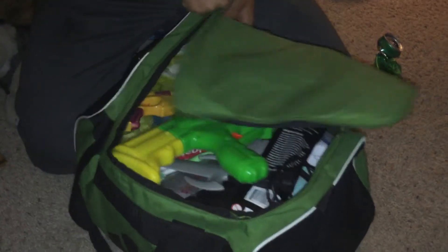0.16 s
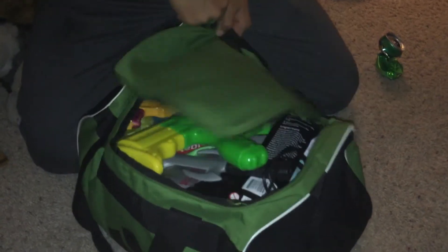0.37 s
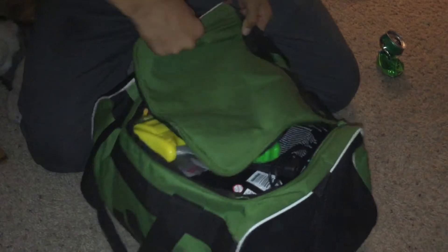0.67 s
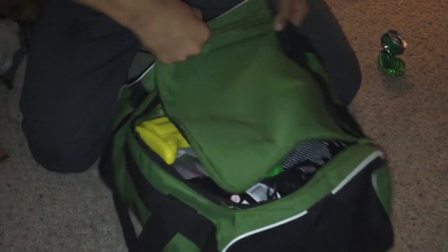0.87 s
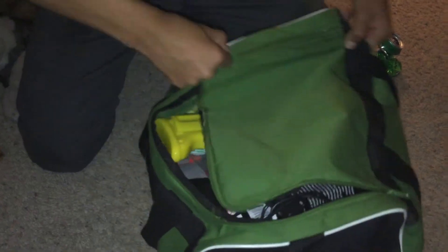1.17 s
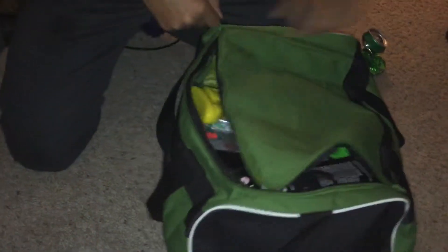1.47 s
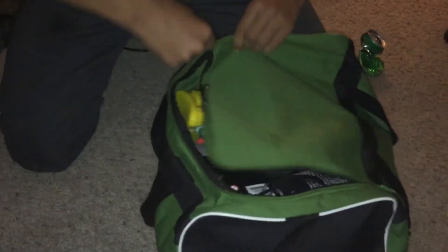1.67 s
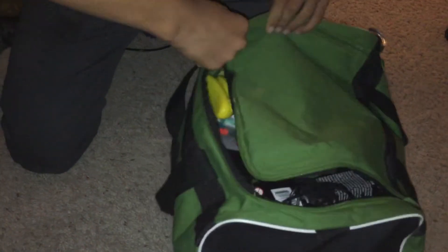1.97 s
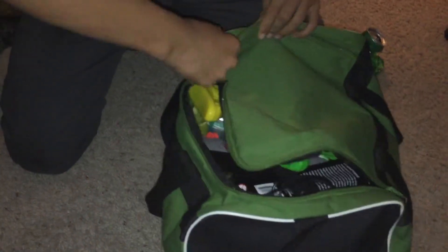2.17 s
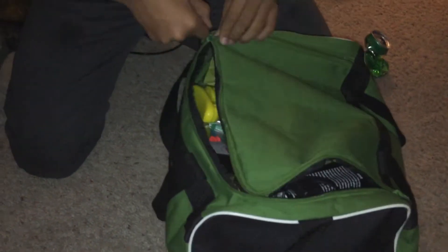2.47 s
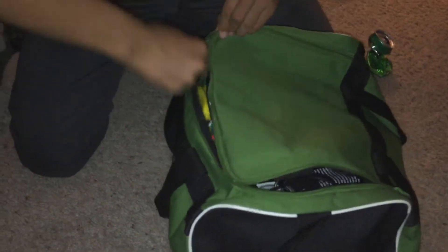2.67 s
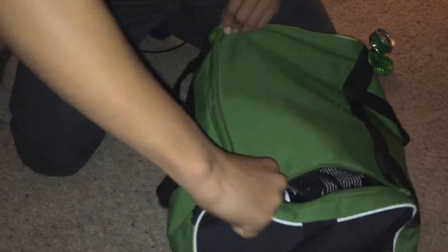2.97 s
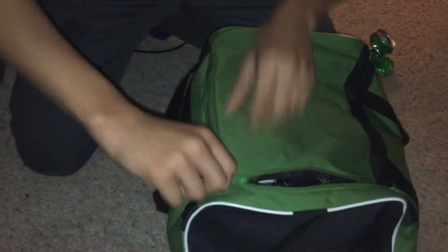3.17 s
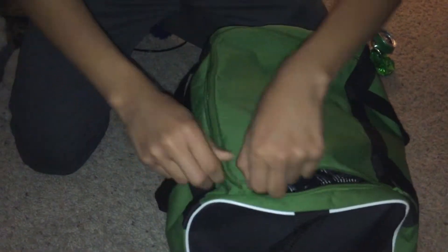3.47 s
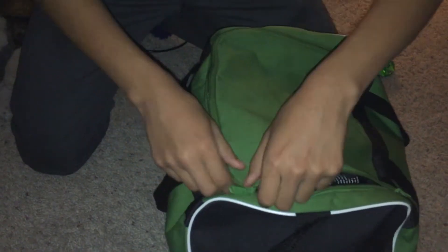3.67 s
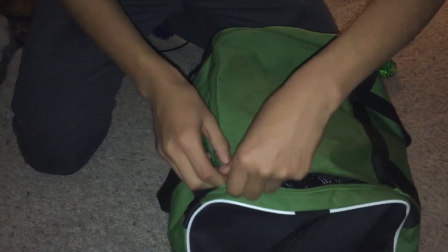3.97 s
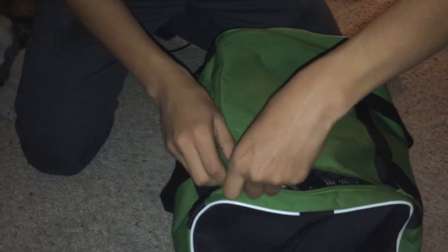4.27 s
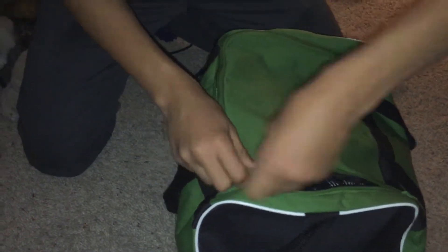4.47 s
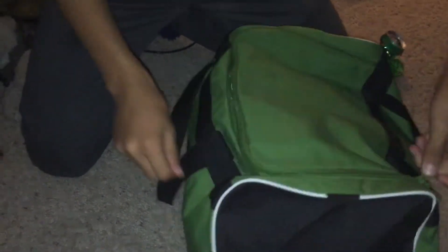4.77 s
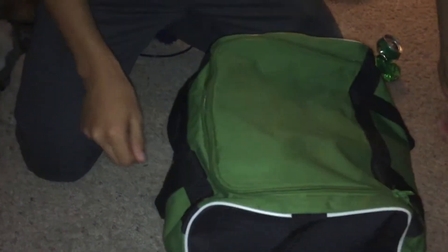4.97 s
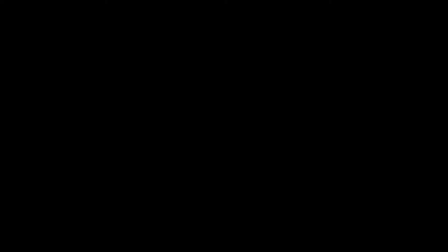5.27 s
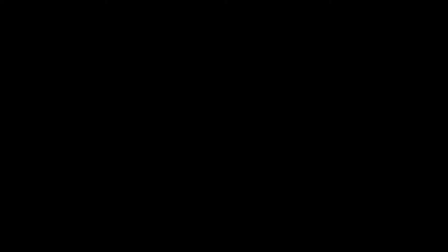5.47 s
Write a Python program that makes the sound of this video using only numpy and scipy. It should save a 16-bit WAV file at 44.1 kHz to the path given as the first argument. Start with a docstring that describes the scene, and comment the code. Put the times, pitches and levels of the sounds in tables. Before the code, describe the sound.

Close view of a fabric bag in a small, quiet carpeted room. Cloth rustles and flops, a short zipper buzz, more crumpling, then a sharp louder jerk of the zip. After a calmer stretch of faint brushing comes a longer, higher, softer pull. The metal tab clinks, then a very quick bright zip ends with a hard click and fading rustle.

```python
"""A buzz rises with each tug as a fabric duffel bag is zipped shut in four short pulls on the carpet of a
quiet room. Between pulls the cloth rustles and flops, things inside knock and the metal pull tab clinks.
The buzz is a train of tooth snaps, two tapes meshing in turn, through the resonances of tape and bag.
Cloth is filtered noise, drum notes and crackle; metal and knocks are struck decaying sines; a faint hush
lies below."""
import sys
import numpy as np
from scipy import signal
from scipy.fft import rfft, irfft, next_fast_len
from scipy.io import wavfile
from scipy.ndimage import uniform_filter1d

SR = 44100
rng = np.random.default_rng(int(sys.argv[2]) if len(sys.argv) > 2 else 0)


def unload_wav(signal):
    """Save mono or channel-first audio to the path in sys.argv[1] as 16-bit WAV at rate SR, clipped to [-1, 1]."""
    wavfile.write(
        sys.argv[1],
        SR,
        np.round(np.clip(np.atleast_2d(signal).T, -1, 1) * 32767).astype(np.int16),
    )


N = 247842
END_S = 5.118
TIME = np.arange(N) / SR
BLOW = TIME[:SR // 4]  # time axis of one short hit

# scratchy spectrum of the slider's scrape and of hands on the weave: f/Hz, level/dB
SCRAPE_SPECTRUM = [(800, -7.5), (2600, 1), (4500, -3.5), (7000, -2.5), (8700, 1.5), (10500, -3.5),
                   (13000, -5)]
# spectrum of stiff cloth crumpling: f/Hz, level/dB
CRUMPLE_SPECTRUM = [(150, -14.5), (450, -4.5), (1100, 1), (2000, -5), (4500, -14), (8000, -16.5),
                    (16000, -24.5)]
# the hands shift the bag: start t/s, length/s, heaving level/dB, crumpling level/dB
BAG_SHIFTS = [(0, 0.23, -48.5, -48.5), (0.36, 0.13, -49.5, -56), (0.506, 0.24, -46.5, -46),
              (0.871, 0.044, -37, -41), (0.96, 0.065, -45, -52), (1.012, 0.057, -38.5, -43.5),
              (1.274, 0.13, -39, -40.5), (1.465, 0.26, -50.5, -57.5), (1.71, 0.063, -47, -52),
              (1.905, 0.21, -59, -63), (2.318, 0.04, -48.5, -56.5), (2.658, 0.29, -46.5, -53),
              (2.915, 0.051, -38, -46), (2.994, 0.078, -46.5, -56), (3.498, 0.2, -64.5, -70),
              (4.578, 0.13, -40, -41.5), (4.669, 0.042, -35, -32), (4.782, 0.12, -46, -58),
              (4.884, 0.047, -42.5, -47)]


def undb(db):
    """Decibels to gain."""
    return 10 ** (np.asarray(db) / 20)


def unit(x):
    """Scale to rms 1."""
    return x / np.sqrt(np.mean(x ** 2))


def peak(x, db):
    """Scale to a peak level."""
    return x * undb(db) / np.max(np.abs(x))


def smooth(x, seconds):
    """Triangular running mean: two box averages of this length."""
    k = int(seconds * SR) + 1
    return uniform_filter1d(uniform_filter1d(x, k), k)


def even(x, seconds):
    """Level the running rms to about 1."""
    return x / np.sqrt(np.abs(smooth(x ** 2, seconds)) + 1e-12)


def colour(x, points):
    """Causal minimum-phase filter through (Hz, dB) points."""
    hz, db = np.transpose(points)
    half = next_fast_len(len(x) // 2 + 4096)
    freq = np.linspace(1, SR / 2, half + 1)
    level_db = np.interp(np.log(freq), np.log(hz), db)
    # folding the cepstrum onto positive time makes the filter causal
    cepstrum = irfft(np.log(undb(level_db)))
    cepstrum[1:half] *= 2
    cepstrum[half:] = 0
    return irfft(rfft(x, 2 * half) * np.exp(rfft(cepstrum)))[:len(x)]


def resonate(x, hz, width):
    """Two-pole band-pass, gain 1 at the centre."""
    b, a = signal.iirpeak(hz, hz / min(width, SR / 4), fs=SR)
    return signal.lfilter(b, a, x)


def fade(t60):
    """Exponential decay, 60 dB down after t60 seconds."""
    return np.exp(-np.log(1000) * BLOW / t60)


def burst(t60):
    """Noise that dies away."""
    return rng.standard_normal(len(BLOW)) * fade(t60)


def ring(modes):
    """Struck modes (Hz, dB, t60 s), their balance a little different at each blow."""
    out = np.zeros(len(BLOW))
    for hz, db, t60 in modes:
        out += undb(db + rng.normal()) * fade(t60) * np.sin(2 * np.pi * hz * BLOW)
    return out


def add(out, start, sound):
    """Mix a sound in at its time."""
    i = int(start * SR)
    out[i:i + len(sound)] += sound[:N - i]


def flicker(rate, depth_db):
    """A gain that wanders at random between rate knots per second."""
    knots = np.arange(0, N / SR + 1, 1 / rate)
    return undb(depth_db * np.interp(TIME, knots, rng.standard_normal(len(knots))))


def grains(rate, spread_db, rub):
    """Tiny slips of uneven size, rate per second, over smooth rubbing."""
    happens = rng.random(N) < rate / SR
    size = undb(spread_db * (2 * rng.random(N) - 1))
    slips = happens * rng.standard_normal(N) * size
    return unit(slips) + rub * rng.standard_normal(N)


def zipper():
    """Four pulls of one to three tugs; in the last, tight and askew tapes snap brightly in close pairs."""
    # tugs on the slider: top speed t/s, build-up/s, slow-down/s, top tooth rate of one tape f/Hz,
    # buzz level/dB, level slope/(dB per octave of speed), bite at top speed/dB
    tugs = [(.667, 0.068, 0.056, 666, -32, 3, 8), (1.309, 0.027, 0.027, 659, -22.5, 10.5, -0.5),
            (1.318, 0.032, 0.016, 574, -25.5, 6, 2.5), (2.785, .08, .056, 842, -34, 5, 0),
            (2.892, 0.11, 0.031, 1123, -34, -1, 5), (4.632, .047, .05, 1028, -29, 6.5, 0),
            (4.665, .03, .014, 1673, -28.5, 7.5, 3), (4.683, 0.031, 0.0091, 1596, -27, 6.5, 9.5)]
    first = pull(tugs[:1], twin=.55, jitter=.05, scatter_db=3, rasp=.35, scrape_db=-20, lag=.5,
                 soft_hz=190, tape_pitch=1.04, bright_db=-0.2)
    jerk = pull(tugs[1:3], twin=.65, jitter=.06, scatter_db=2.8, rasp=.3, scrape_db=-19, lag=.5,
                soft_hz=207, tape_pitch=0.84, bright_db=-0.6)
    side = pull(tugs[3:5], twin=.42, jitter=.05, scatter_db=3, rasp=.22, scrape_db=-10, lag=.5,
                soft_hz=400, tape_pitch=1.01, bright_db=1.0)
    last = pull(tugs[5:], twin=.55, jitter=.018, scatter_db=1.5, rasp=.06, scrape_db=-7, lag=.34,
                soft_hz=600, tape_pitch=0.96, bright_db=3.0)
    return first + jerk + side + last


def pull(tugs, twin, jitter, scatter_db, rasp, scrape_db, lag, soft_hz, tape_pitch, bright_db):
    """Teeth snap and rub; the second tape (strength twin) lags by a share of a cycle, bites with speed."""
    # body of the buzz: f/Hz, level/dB
    tape_spectrum = [(80, -16), (240, 7.5), (500, 2), (1300, 3), (3000, -14), (5000, -22), (16000, -25)]
    # resonances of the taut tape and the bag behind it: f/Hz (times tape_pitch), width/Hz, level/dB
    tape_modes = [(610, 63, 4.5), (990, 320, 3.5), (1400, 68, -7.5), (2058, 170, -5.5)]
    # dull putter of slow teeth: f/Hz, level/dB
    putter_spectrum = [(90, -14.5), (250, -0.5), (600, -1.5), (9000, -42)]
    tooth_slop = .03  # scatter of the tooth spacing, in cycles of one tape
    seize_s = 0.012  # the sound eases in as the slider starts to move

    rate_hz, buzz_db = stroke(tugs)
    moving = rate_hz > 0
    tension, friction, unevenness, slop = rng.standard_normal((4, N))
    # uneven tension makes the slider hurry and lag
    speed = rate_hz[moving] * np.exp(jitter * unit(smooth(tension[moving], .001)))
    travel = np.cumsum(2 * speed / SR)  # in teeth, both tapes counted

    tooth = np.arange(int(travel[-1]))
    second = tooth % 2
    second_size = twin * np.minimum(np.interp(tooth, travel, speed) / 550, 1)
    size = np.where(second, second_size, 1) * undb(scatter_db * unevenness[tooth])
    cycle = tooth // 2 + lag * second + tooth_slop * slop[tooth]
    place = np.interp(2 * cycle, travel, np.arange(len(speed)))
    # share each snap between its two nearest samples
    sample, fraction = place.astype(int), place % 1
    snaps = np.zeros(len(speed) + 1)
    np.add.at(snaps, sample, size * (1 - fraction))
    np.add.at(snaps, sample + 1, size * fraction)
    snaps = unit(snaps - smooth(snaps, 0.0069))[:-1]

    # rubbing surges once per tooth of travel, then eases
    rubbing = unit(np.exp(-(travel % 1) / 0.44) * friction[moving])
    force = disperse(snaps) + rasp * rubbing
    # each stretch of tape has its own pitch
    buzz = colour(force, tape_spectrum)
    for hz, width, db in tape_modes:
        buzz = buzz + undb(db) * resonate(force, tape_pitch * hz, width)
    # tension tilts it by bright_db an octave over four octaves
    buzz = colour(buzz, [(500, 0), (8000, 4 * bright_db)])
    # below soft_hz the teeth slip in with a dull putter instead of a snap
    hard = 1 / (1 + (soft_hz / speed) ** 4)
    putter = unit(colour(force, putter_spectrum))
    buzz = hard * unit(buzz) + (1 - hard) * putter

    seize = 1 - np.exp(-TIME[:len(speed)] / seize_s)
    scrape = colour(rubbing + 0.38 * snaps, SCRAPE_SPECTRUM)
    mix = even(buzz, 0.019) + undb(scrape_db) * even(scrape, 0.0066)
    out = np.zeros(N)
    out[moving] = seize * mix * undb(buzz_db[moving])
    return out


def stroke(tugs):
    """Tooth rate and buzz level: a tug builds up, bites at top speed, stops short; the faster tug leads."""
    roundness, stall_share = 1.3, .16  # of the speed peak; share of top speed below which the slider sticks
    bite_share, relax_db = 0.48, 8.5  # bite width as a share of slow-down; grip loss one slow-down later
    at, build, slow, top_hz, db, db_per_octave, bite_db = np.transpose(tugs)[:, :, None]
    after = (TIME - at) / slow
    share = np.exp(-np.maximum((at - TIME) / build, after) ** roundness)
    rate_hz = top_hz * share * (share > stall_share)
    speed_db = db_per_octave * np.log2(np.maximum(share, stall_share))
    bite = bite_db * np.exp(-(after / bite_share) ** 2)
    relax = relax_db * np.maximum(after, 0) ** 2
    buzz_db = db + speed_db + bite - relax
    leader = rate_hz.argmax(axis=0)
    return rate_hz.max(axis=0), smooth(np.choose(leader, buzz_db), .002)


def disperse(x, count=10):
    """Along the tape the treble outruns the bass (all-pass chain), so each snap becomes a tiny chirp."""
    return signal.sosfilt([[-.8, 1, 0, 1, -.8, 0]] * count, x)


def cloth():
    """The bag heaves, its panels drumming, and its creases crumple in bunches."""
    # low rumble of the heaving bag: f/Hz, level/dB
    heave_spectrum = [(25, -30.5), (62, 4), (95, -7.5), (150, 3), (310, -4), (480, -15.5), (2000, -51.5)]
    held_heave_db, held_crumple_db = -68, -74  # the bag merely held
    _, _, heave_db, crumple_db = np.transpose(BAG_SHIFTS)
    rumble = unit(colour(grains(300, 6, 0.25), heave_spectrum) * flicker(30, 2.3))
    drums = unit(drumming(rate=45, spread_db=12.0, t60=0.062))
    heave = even(drums + 0.75 * rumble, 0.048)
    rub = unit(colour(rng.standard_normal(N), CRUMPLE_SPECTRUM))
    crumple = .7 * rub + unit(crackling(rate=300, spread_db=24, cycles=.8))
    crumple = even(crumple * flicker(140, 1.7), 0.04)
    return heave * shifting(heave_db, held_heave_db) + crumple * shifting(crumple_db, held_crumple_db)


def shifting(levels_db, held_db):
    """Cloth gain: each shift builds quickly, eases, then dies as the cloth settles, over the held bag's stir."""
    attack_s, ease_db_per_s, settle_db_per_s = .018, 4, 234.5  # settling adds to the easing
    power = undb(held_db) ** 2
    for (start, length, *_), db in zip(BAG_SHIFTS, levels_db):
        age = np.maximum(TIME - start, 0)
        drop_db = ease_db_per_s * age + settle_db_per_s * np.maximum(age - length, 0)
        attack = np.minimum(age / attack_s, 1) ** 2
        power = power + (attack * undb(db - drop_db)) ** 2
    return np.sqrt(power)


def drumming(rate, spread_db, t60):
    """The panels of the bag thump at random, each at its own pitch."""
    out = np.zeros(N)
    for when, pitch, size in rng.random((int(rate * END_S), 3)):
        hz = 115 * 3.2 ** pitch
        add(out, when * END_S, thump(hz, t60) * undb(spread_db * size))
    return out


def thump(hz, t60):
    """A slack panel gives way softly, then drums for a few cycles."""
    note = ring([(hz, 0, t60), (hz * 1.8, -8, t60 / 2)])
    return note * (1 - np.exp(-BLOW * hz))


def crackling(rate, spread_db, cycles):
    """Countless small creases give way, each a few cycles at its own pitch, the high ones weaker."""
    out = np.zeros(N)
    age = BLOW[:SR // 60]
    for when, pitch, size in rng.random((int(rate * END_S), 3)):
        turns = 450 * 11 ** pitch * age
        pop = np.sin(2 * np.pi * turns) * turns / cycles * np.exp(-turns / cycles)
        add(out, when * END_S, pop * undb(spread_db * size - 7 * pitch))
    return out


def flops():
    """A panel snaps taut, a damped drum note with a crack; single creases pop, and so do the first pull's slow
    early teeth."""
    # cloth snaps taut or flops: t/s, reference level/dB, panel pitch f/Hz, crack peak re reference/dB
    flop_hits = [(.206, -32, 225, -1), (.238, -31, 395, -8), (.708, -19.5, 286, 0), (.899, -22, 201, -4),
                 (1.033, -23.5, 320, -8), (1.057, -23.5, 362, 0.5), (1.366, -25, 161, 1.5),
                 (2.032, -33, 156, -25), (2.96, -31.5, 300, -8), (3.055, -27, 140, -35),
                 (4.746, -26.5, 175, 1)]
    # creases of the stiff cloth pop, and the first pull's slow single teeth snap (.529 to .581 s): t/s, peak
    # level/dB, centre f/Hz
    pops = [(.120, -31, 890), (.233, -31, 1070), (.38, -36, 650), (.529, -34.5, 1100),
            (.555, -26, 1100), (.581, -22.5, 1210), (.918, -29, 1500), (1.022, -28, 1100),
            (1.103, -32, 1210), (1.288, -20, 1330), (1.387, -31, 840), (1.595, -35, 1630),
            (1.796, -39.5, 1300), (1.812, -42, 1300), (2.03, -41, 1420), (2.054, -39.5, 1820),
            (2.914, -23.5, 1350)]
    out = np.zeros(N)
    for s, db, hz, crack_db in flop_hits:
        add(out, s, peak(thump(hz, 0.031), db - 2.5))
        add(out, s, peak(colour(burst(0.018), CRUMPLE_SPECTRUM), db + crack_db))
    for s, db, hz in pops:
        add(out, s, peak(crease(hz), db))
    return out


def crease(hz):
    """A crease lets go, or a lone slow tooth snaps: a dry noise pop through a band as wide as its centre pitch."""
    pop = burst(t60=0.016)[:SR // 25]
    return resonate(colour(pop, CRUMPLE_SPECTRUM), hz, hz)


def brushes():
    """Hands slide over the weave: a grainy scuff whose pitch depends on the stroke."""
    # hand strokes: start t/s, length/s, level/dB before the fade in and out, scuff centre f/Hz
    strokes = [(0.08, 0.15, -50.5, 6140), (0.385, 0.1, -57.5, 3180), (1.523, 0.045, -56, 3200),
               (1.708, 0.083, -56.5, 3180), (2.289, 0.029, -48, 2760), (2.304, .052, -54.5, 3970),
               (2.436, .053, -61, 8000), (3.089, 0.049, -52.5, 3650), (3.565, 0.2, -64, 8400),
               (3.922, 0.13, -61.5, 4000)]
    out = np.zeros(N)
    weave = colour(grains(2500, 4.1, 0.41), SCRAPE_SPECTRUM) * flicker(160, 4.1)
    for start, length, db, hz in strokes:
        threads = weave[int(start * SR):int((start + length) * SR)]
        scuff = unit(unit(resonate(threads, hz, 0.47 * hz)) + 1.35 * unit(threads))
        add(out, start, undb(db) * scuff * np.hanning(len(scuff)) ** .3)
    return out


def clinks():
    """The pull tab hits the slider: ringing metal modes with a dry tick of noise."""
    # tab hits: t/s, ring peak level/dB, tick peak re ring/dB, pitch of the first mode f/Hz
    tab_hits = [(3.51, -37, -3, 8420), (3.533, -22, -2, 8550), (3.643, -40.5, 2.5, 8500),
                (4.011, -20.5, -6.5, 8500), (4.724, -27, -6.5, 8420), (4.749, -29.5, -18, 8360),
                (4.883, -40, -7, 8500), (4.929, -35, -1, 8500)]
    # tab modes, all retuned to each hit's pitch: f/Hz, relative level/dB, t60/s
    tab_modes = [(8420, -9, .045), (8560, -4, .025), (9150, -9, .018), (12200, -12.5, .012),
                 (8440, -24, .16)]
    out = np.zeros(N)
    for s, db, tick_db, pitch_hz in tab_hits:
        modes = np.array(tab_modes) * [pitch_hz / tab_modes[0][0], 1, 1]
        tick = resonate(burst(.015), 11500, 7000)
        add(out, s, peak(ring(modes), db) + peak(tick, db + tick_db))
    return out


def ticks():
    """Single teeth and the end stop click: short noise through two equal band-passes."""
    # clicks: t/s, peak level/dB, centre f/Hz
    clicks = [(0.125, -26.5, 12500), (0.32, -41, 5650), (1.189, -37.5, 12980), (1.302, -20.5, 2660),
              (1.542, -32.5, 3000), (3.861, -33.5, 11600), (4.685, -10.5, 13400), (4.866, -29, 4550)]
    out = np.zeros(N)
    for s, db, hz in clicks:
        width = 0.71 * hz
        click = resonate(resonate(burst(.012), hz, width), hz, width)
        add(out, s, peak(click, db))
    return out


def knocks():
    """Things inside the bag knock together: short, damped modes."""
    # knocks: t/s, peak level/dB
    hits = [(1.467, -36.5), (3.288, -41), (3.436, -37), (4.122, -49), (4.906, -35)]
    # modes of the contents: f/Hz, relative level/dB, t60/s
    knock_modes = [(1020, 17, 0.016), (1430, 19, 0.014), (2090, -26, 0.012)]
    out = np.zeros(N)
    for s, db in hits:
        add(out, s, peak(ring(knock_modes), db))
    return out


def afterring(start, swell_s):
    """A faint, rough ring of banded noise swells and fades as the hands let go of the closed bag."""
    # ring bands: f/Hz, width/Hz, level/dB, t60/s
    bands = [(1600, 35, -57, 0.36), (1850, 300, -60.5, 0.47), (4600, 3200, -58.5, 0.21)]
    noise = rng.standard_normal(N)
    swell = np.interp(TIME, [start, start + swell_s], [.25, 1]) * (TIME > start)
    late = np.maximum(TIME - start - swell_s, 0)
    out = np.zeros(N)
    for hz, width, db, t60 in bands:
        band = unit(resonate(resonate(noise, hz, width), hz, width))
        out += band * undb(db - 60 * late / t60)
    return swell * out


def room(x, t60, wet_db, slap_s, slap_db):
    """A small carpeted room: a near surface throws back the treble, its delay wandering; then a short tail."""
    treble = colour(x, [(300, -14), (2000, -2)])
    slap = np.interp(TIME - slap_s * flicker(3, .6), TIME, treble)
    tail = burst(t60) * (BLOW > .004)
    tail = colour(tail / np.linalg.norm(tail), [(1200, -1.5), (14000, -2.5)])
    return x + undb(slap_db) * slap + undb(wet_db) * signal.fftconvolve(x, tail)[:N]


def hush():
    """Faint steady noise of the quiet room, strongest in the low bass."""
    # hush spectrum: f/Hz, level/dB
    hush_spectrum = [(24, -33), (55, 4), (110, -4), (350, -25.5), (2300, -25.5), (16000, -37.5)]
    return undb(-62) * unit(colour(rng.standard_normal(N), hush_spectrum))


def scene():
    """The bag in its room, over a faint steady hush."""
    bag = zipper() + cloth() + flops() + brushes()
    bag += clinks() + ticks() + knocks() + afterring(start=4.68, swell_s=0.27)
    bag = room(bag, t60=0.15, wet_db=-11.0, slap_s=.0023, slap_db=-12)
    return (bag + hush())[None]


def record(dry):
    """The sound stops shortly after the bag is shut; a steep low-pass cuts the top."""
    top_hz = 15900
    low_pass = signal.ellip(10, .2, 70, top_hz, fs=SR, output="sos")
    return signal.sosfilt(low_pass, dry * (TIME < END_S))


dry = scene()
out = record(dry)
unload_wav(out)
```